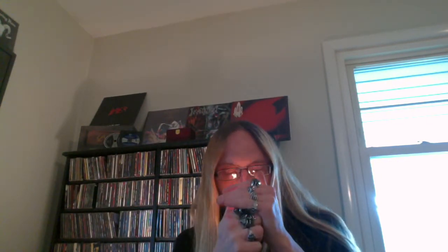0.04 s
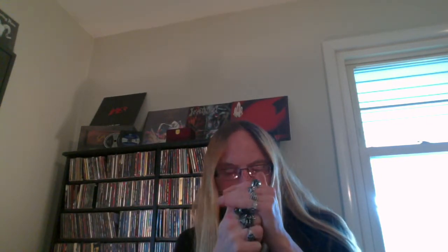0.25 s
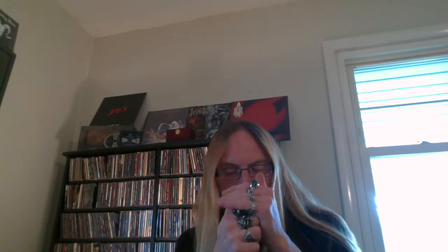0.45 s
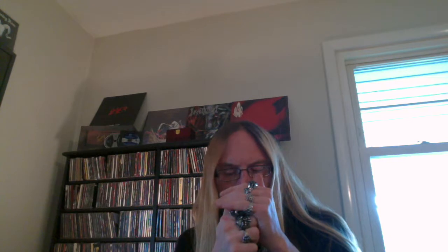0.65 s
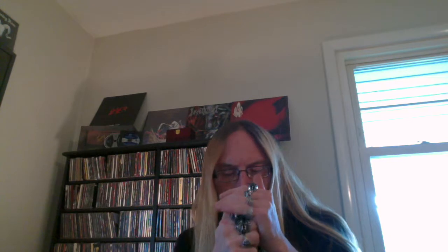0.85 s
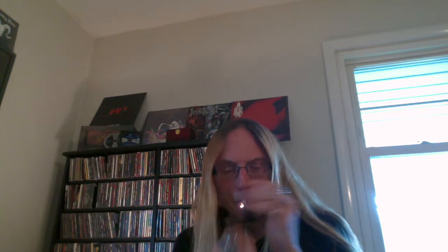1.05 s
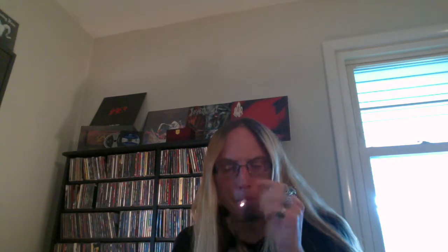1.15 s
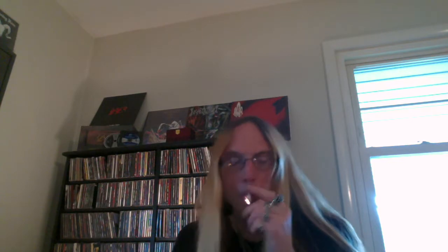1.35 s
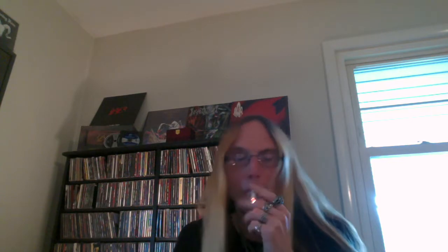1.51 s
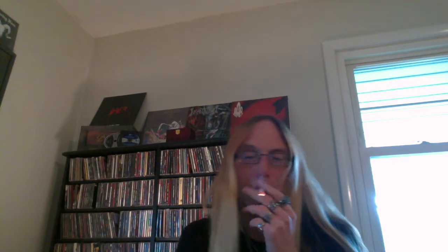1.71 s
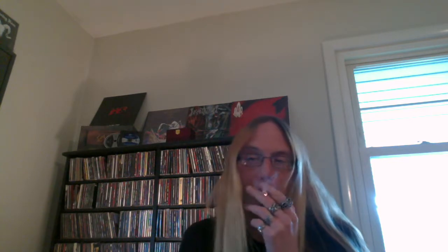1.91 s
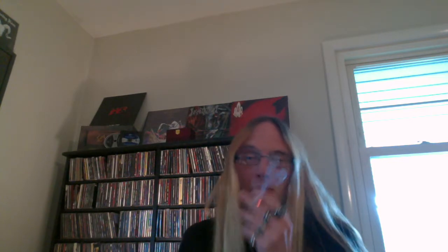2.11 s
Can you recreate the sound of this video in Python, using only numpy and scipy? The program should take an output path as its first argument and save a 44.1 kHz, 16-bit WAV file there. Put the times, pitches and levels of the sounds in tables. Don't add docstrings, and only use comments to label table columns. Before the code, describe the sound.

In a quiet, faintly humming room, faint hinge ticks and a brief skin scuff precede a hard metallic lighter clack, then a short ring, room echo and soft desk bumps, heard through a small desk microphone.

```python
import sys
import numpy as np
from scipy import signal
from scipy.fft import rfft, irfft
from scipy.io import wavfile
from scipy.ndimage import uniform_filter1d, map_coordinates

SR = 44100
rng = np.random.default_rng(int(sys.argv[2]) if len(sys.argv) > 2 else 0)


def pcm_store(signal):
    levels = np.round(np.clip(np.atleast_2d(signal), -1, 1) * 32767)
    wavfile.write(sys.argv[1], SR, levels.astype(np.int16).T)


def rack_gain(trim_db):
    fader = np.asarray(trim_db, float)
    return 10 ** (fader / 20)


N = 95564
NOW = np.arange(N) / SR
BRIEF = np.arange(SR // 10) / SR

# start_s, crack_db, crack_pitch_hz
CONTACTS = [
    (1.5034, -8, 9900),
    (1.5145, 8.5, 6900),
    (1.5236, -11, 6300),
    (1.5277, -10, 8800),
    (1.5747, -8, 10000),
    (1.5831, -1, 6900),
    (1.5915, -16, 10500),
    (1.6135, -9, 7700),
]
# knock_db, knock_tilt_db_per_octave, ring_db
CONTACT_BODY = [
    (-8.5, -15, -35.5),
    (-4, 2.5, -18.5),
    (-8, 4, -30),
    (-14.5, 1, -30),
    (-29.5, 2.5, -31),
    (-13.5, 2.5, -23),
    (-7, -3, -42.5),
    (-12, 2, -24),
]
CRACK_RISE_S = 0.0003


def unit(x):
    return x / np.sqrt(np.mean(x ** 2) + 1e-20)


def along(points, hz):
    f, v = np.transpose(points)
    return np.interp(np.log(hz + 1), np.log(f + 1), v)


def wobble(rate, size=N):
    knots = rng.standard_normal(size // 20 + 4)
    return map_coordinates(knots, [np.arange(size) * rate / SR])


def hiss(gain):
    spectrum = rfft(rng.standard_normal(N))
    return unit(irfft(spectrum * gain(np.fft.rfftfreq(N, 1 / SR)), N))


def ring(hz, db, t60, t):
    return rack_gain(db - 60 * t / t60) * np.sin(2 * np.pi * hz * t)


def add(track, start_s, x):
    part = track[round(start_s * SR):][:len(x)]
    part += x[:len(part)]


def earlier_echo():
    # pitch_hz, level_db
    echo_tone = [(500, -25), (1000, -12.5), (2200, -0.5), (3200, -11.5), (5600, 3.5), (8000, -5),
                 (10500, -7), (15500, -38)]
    level_db, t60_s = -52.5, 0.32
    return rack_gain(level_db - 60 * NOW / t60_s) * hiss(lambda f: rack_gain(along(echo_tone, f)))


def air():
    # pitch_hz, level_db
    air_tone = [(24, -51), (40, -36), (69, 0), (243, 1.5), (345, -8.5), (769, -10), (1150, -14),
                (11200, -32), (15900, -34)]
    level_db, patch_db = -66, 1.2
    z = signal.stft(hiss(lambda f: rack_gain(along(air_tone, f))), nperseg=512)[2]
    patches = uniform_filter1d(rng.standard_normal(z.shape), 6, 0)
    patches = uniform_filter1d(patches, 8, 1)
    patchy = signal.istft(z * rack_gain(patch_db * unit(patches)), nperseg=512)[1][:N]
    return rack_gain(level_db) * unit(patchy)


def hum():
    # pitch_hz, level_db
    tones = [
        (84, -85.5),
        (118, -74),
        (240, -89.5),
        (762, -80.5),
    ]
    return sum(rack_gain(db + 1.7 * wobble(9)) * np.sin(2 * np.pi * hz * NOW) for hz, db in tones)


def crack(hz, t60, second_db, spit_db):
    spread, second_ratio = 0.07, 1.5
    places = np.linspace(-1, 1, num=5) + rng.normal(0, 0.15, size=5)
    tone = 0
    for f in hz * (1 + spread * places):
        tone = tone + ring(f, -7, t60, BRIEF) + ring(f * second_ratio, second_db - 7, t60, BRIEF)
    noise = rng.standard_normal(len(BRIEF))
    bright = noise - uniform_filter1d(noise, size=30)
    spit = rack_gain(spit_db - 60 * BRIEF / t60) * bright
    return (tone + spit) * (1 - np.exp(-BRIEF / CRACK_RISE_S))


def walls(x):
    # pitch_hz, t60_s
    wall_t60 = [(200, 1), (1000, 0.66), (4000, 0.63), (8000, 0.5), (14000, 0.35)]
    # pitch_hz, level_db
    wall_tone = [(100, -22), (500, -7), (1500, -2.5), (2500, 2.5), (5000, -2.5), (7000, -2.5), (10000, -2),
                 (15000, -9.5)]
    delay_s, rise_s = 0.006, 0.0097
    curl = 1.085
    hz, t, z = signal.stft(rng.standard_normal(SR), SR, nperseg=256)
    decay = rack_gain(-60 * t * (1 + curl * t) / along(wall_t60, hz)[:, None])
    tail = signal.istft(z * decay, SR, nperseg=256)[1]
    tail = tail * (1 - np.exp(-np.arange(len(tail)) / SR / rise_s))
    f = np.fft.rfftfreq(len(tail), 1 / SR)
    spectrum = rfft(tail / np.linalg.norm(tail))
    tail = irfft(spectrum * rack_gain(along(wall_tone, f)), len(tail))
    return signal.fftconvolve(np.pad(x, (round(delay_s * SR), 0)), tail)


def hinge_ticks():
    # start_s, level_db, pitch_hz
    ticks = [
        (.9005, -63, 9300),
        (.9215, -60, 7600),
        (.932, -66, 8500),
        (1.047, -57, 7000),
        (1.1978, -47, 7200),
        (1.992, -69, 8500),
        (2.035, -70, 9500),
    ]
    out = np.zeros(N)
    for start_s, db, hz in ticks:
        tick = rack_gain(db) * crack(hz, t60=0.018, second_db=-17, spit_db=-17)
        add(out, start_s, tick)
        add(out, start_s, rack_gain(-14) * walls(tick))
    return out


def thumb_scuff():
    # pitch_hz, width_hz, peak_s, rise_s, fall_s, level_db
    bands = [
        (9600, 950, 1.128, .02, .028, -58),
        (6500, 900, 1.1255, .005, .018, -55),
        (3650, 500, 1.142, .012, .035, -70),
        (1800, 1200, 1.13, .01, .06, -71),
    ]
    out = np.zeros(N)
    for hz, width_hz, peak_s, rise_s, fall_s, db in bands:
        swell = np.exp(-np.where(NOW < peak_s, (peak_s - NOW) / rise_s, (NOW - peak_s) / fall_s))
        grain = rack_gain(3 * wobble(260))
        out += rack_gain(db) * swell * grain * hiss(lambda f: np.exp(-((f - hz) / width_hz) ** 2))
    return out


def desk_bumps():
    # start_s, level_db, pitch_hz
    bumps = [
        (1.933, -34, 250),
        (2.146, -43, 280),
        (1.238, -50, 220),
    ]
    out = np.zeros(N)
    for start_s, db, hz in bumps:
        add(out, start_s, ring(hz, db, 0.03, BRIEF) * (1 - np.exp(-BRIEF * hz)))
    return out


def case_knock(level_db, tilt_db):
    # pitch_hz, level_db, t60_s
    modes = [(770, -9.5, 0.037), (999, -3, 0.031), (1432, -1.5, 0.017), (1820, -2.5, .02),
             (2580, -12, .015), (3150, -8.5, 0.0088)]
    knock = 0
    for hz, db, t60 in modes:
        mode_db = db + tilt_db * np.log2(hz / 1000) + rng.normal(0, 1.4)
        knock = knock + ring(hz, mode_db, t60, BRIEF)
    return rack_gain(level_db) * knock * (1 - np.exp(-BRIEF / CRACK_RISE_S))


def lid_snap():
    wall_db = -1.5
    blast_db, tonal_db = 11.5, -6.5
    out = np.zeros(N)
    for (start_s, crack_db, hz), (knock_db, tilt_db, _) in zip(CONTACTS, CONTACT_BODY):
        knock = case_knock(knock_db, tilt_db)
        snap = rack_gain(crack_db) * crack(hz, t60=0.011, second_db=-7, spit_db=-7)
        blast = rack_gain(crack_db + blast_db) * (BRIEF == 0)
        add(out, start_s - 0.0003, knock)
        add(out, start_s, snap)
        add(out, start_s, rack_gain(wall_db) * walls(knock + rack_gain(tonal_db) * snap + blast))
    return out


def long_ring():
    case_hz = [1012, 1154, 1243, 1520, 1567, 1783, 1915, 2275, 2488, 2663, 3085, 3540, 4008, 4500]
    # level_db, t60_s
    case = [(-4, .4), (-4, .46), (-9, .45), (-8, .35), (-5, .5), (-9, .33), (-4, .48), (-6.5, .68),
            (-13, .45), (-1.5, .52), (-8, .48), (-11, .45), (-12, .52), (-14, .4)]
    # pitch_hz, level_db, t60_s
    desk = [(171, -22, .75), (283, -10, .9), (425, -18, .45), (494, -11, .62), (597, -16, 1.4),
            (718, -11, .4), (794, -11, .95)]
    attack_s, waver_rad, beat_db = 0.0027, 1, 4
    grip_s, grip_db_per_s = 1.826, 78
    grip_db = grip_db_per_s * np.maximum(NOW - grip_s, 0)
    out = np.zeros(N)
    for hz, db, t60 in [*((hz, *mode) for hz, mode in zip(case_hz, case)), *desk]:
        energy = np.zeros(N)
        for (start_s, _, _), (_, _, ring_db) in zip(CONTACTS, CONTACT_BODY):
            decay = rack_gain(ring_db + db - 60 * NOW / t60)
            add(energy, start_s, (decay * (1 - np.exp(-NOW / attack_s))) ** 2)
        level = np.sqrt(energy) * rack_gain(beat_db * wobble(14) - grip_db)
        out += level * np.sin(2 * np.pi * hz * NOW + waver_rad * wobble(8.7))
    return out


def scene():
    room = earlier_echo() + air() + hum()
    handling = hinge_ticks() + thumb_scuff() + desk_bumps()
    return (room + handling + lid_snap() + long_ring())[None]


def suppress(x):
    start_s, end_s, slope_s, depth = 1.73, 1.8, 0.086, 0.8
    closing = np.clip((NOW - start_s) / slope_s, 0, 1)
    opening = np.clip((end_s - NOW) / slope_s, 0, 1)
    treble = signal.sosfiltfilt(signal.butter(2, 9900, "high", fs=SR, output="sos"), x)
    return x - depth * closing * opening * treble


def roll_off(x):
    return signal.sosfilt(signal.butter(12, 16090, fs=SR, output="sos"), x)


def record(dry):
    # time_s, gain_db
    gain = [(0, 7.5), (.25, 5.5), (.55, 1.5), (.65, -1), (1.078, 0), (1.148, 4), (1.451, 2.5), (1.51, 1.5),
            (1.652, 0.5), (1.8, 2.5), (1.919, 1), (2.048, 8.5), (2.17, 5.5)]
    capsule = signal.butter(2, [64, 12400], "bandpass", fs=SR, output="sos")
    band_edge = signal.cheby1(8, 1, 15700, fs=SR, output="sos")
    x = signal.sosfilt(band_edge, signal.sosfilt(capsule, dry))
    x = suppress(x)
    gain_s, gain_db = np.transpose(gain)
    x = x * rack_gain(np.interp(NOW, gain_s, gain_db))
    ceiling, hardness = 1.08, 20
    x = x / (1 + np.abs(x / ceiling) ** hardness) ** (1 / hardness)
    return roll_off(x)


dry = scene()
out = record(dry)
pcm_store(out)
```